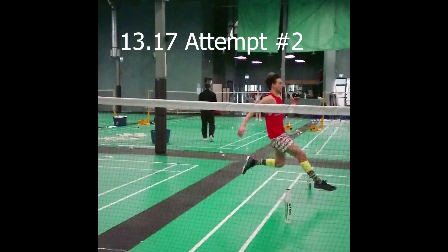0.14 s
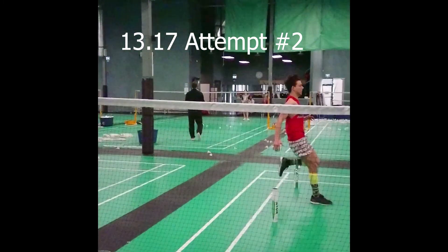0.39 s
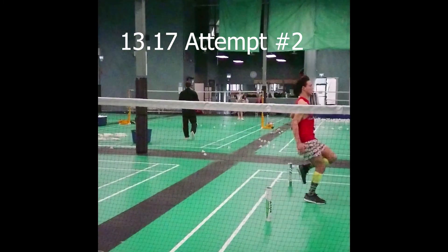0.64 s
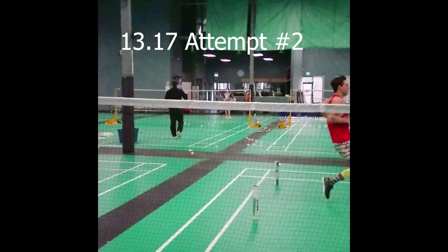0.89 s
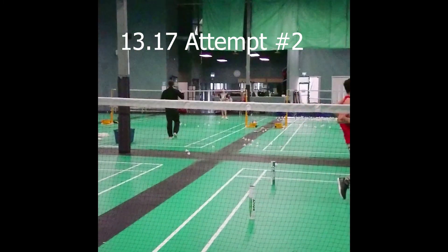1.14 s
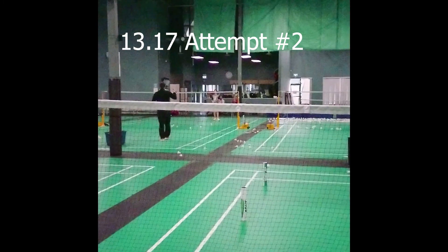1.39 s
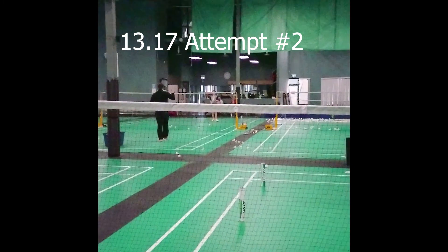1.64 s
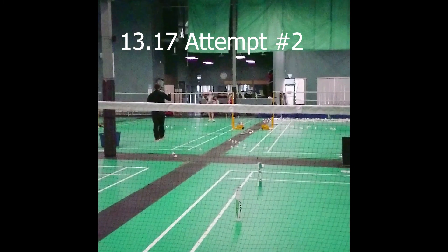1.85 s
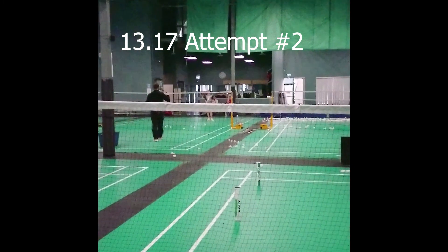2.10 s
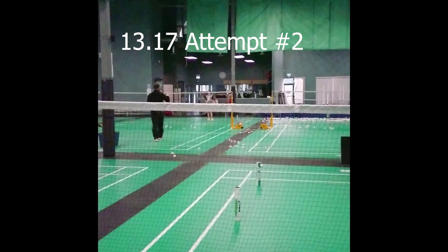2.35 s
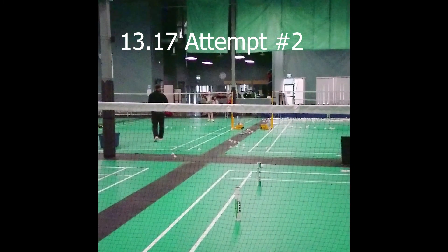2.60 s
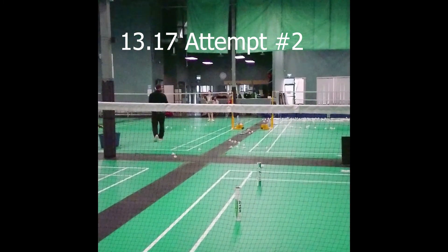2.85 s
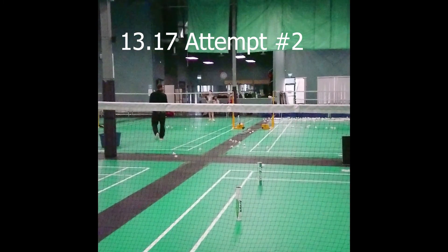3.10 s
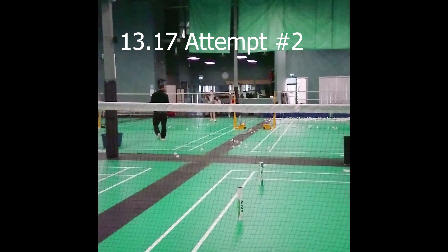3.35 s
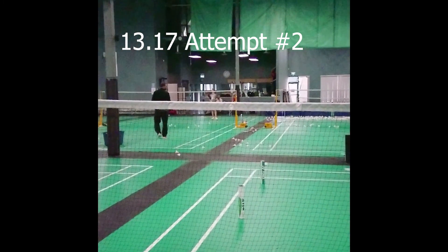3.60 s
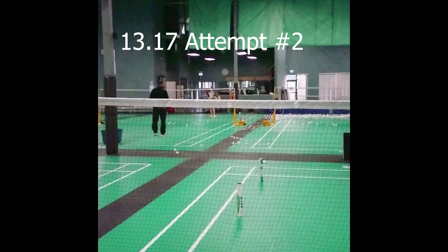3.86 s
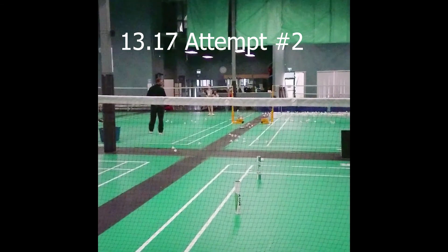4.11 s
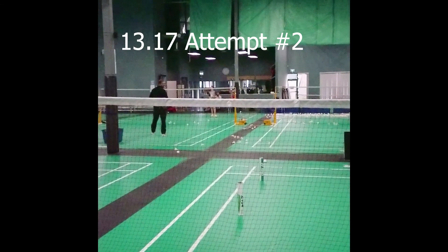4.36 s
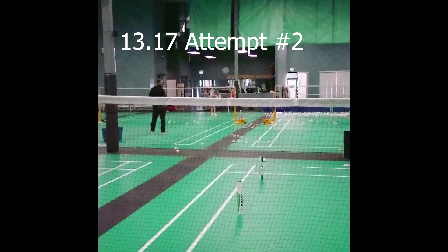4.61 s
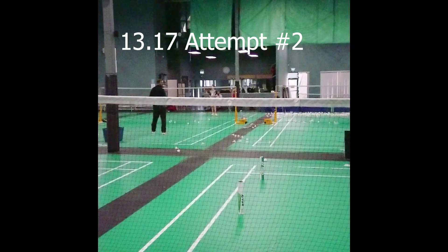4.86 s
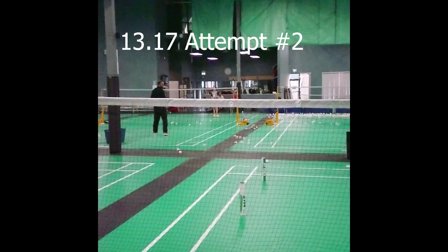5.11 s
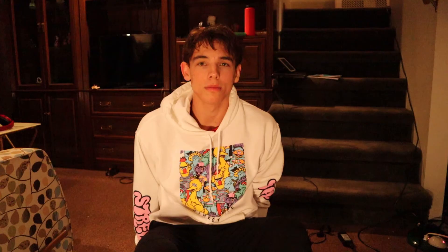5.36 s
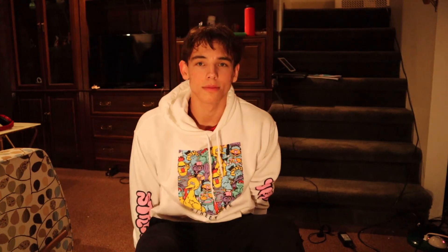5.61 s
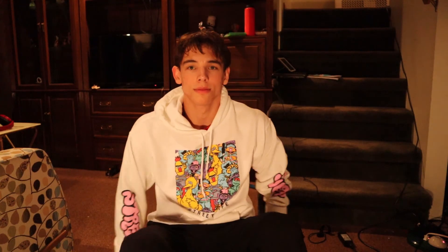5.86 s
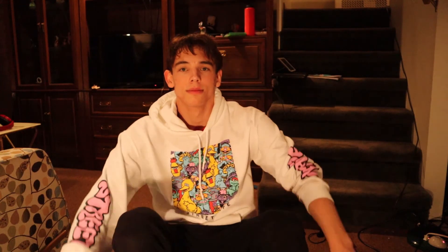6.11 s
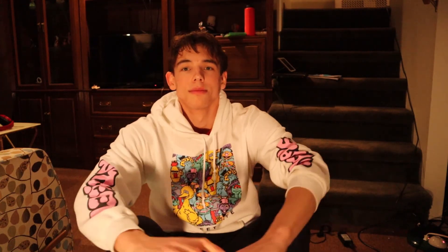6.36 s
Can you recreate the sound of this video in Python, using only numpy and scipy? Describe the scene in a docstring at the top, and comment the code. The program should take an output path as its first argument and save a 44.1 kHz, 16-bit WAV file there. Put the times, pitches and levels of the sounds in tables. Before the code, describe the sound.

A large sports hall, dull and boomy, as if slowed to quarter speed. Low ventilation rumble and the tail of an earlier step open it. From about 0.4 to 0.65 s a faint, thin, wavering shoe squeak swells and stops. Soft double slaps follow at 0.7 s, then the heaviest step at 1.6-1.7 s, with a deep floor thump and long echo. A cluster of scuffs comes at 2.4-2.5 s, a firm double slap at 3.3 s, weaker contacts near 4.05 s and another firm slap at 5.0 s, all ringing on. At 5.4 s the hall cuts off instantly to a quiet, dry living room at normal speed: steady low mains hum and soft hiss. Bright, close sleeve rustles, mainly left, swell at 5.55 s and more weakly around 5.75-6.05 s; a tiny hard tick sounds at 5.97 s. Rustling strengthens at 6.2 s and peaks near 6.35 s.

```python
"""A large hall with a sprung court floor: a runner's footfalls and scuffs as if played back at quarter speed.
Sole slaps are shaped noise bursts, floor thumps damped sines; wall echoes and a long boomy tail are
convolved on, over ventilation noise and a far shoe squeak, a swelling wavering tone.
Then a cut to a quiet living room at normal speed: sleeves rustle (grainy noise), a small tick rings (decaying
sines), mains hum wavers (sines) and the room hisses (shaped noise)."""
import sys
import numpy as np
from scipy import signal
from scipy.fft import rfft, irfft
from scipy.io import wavfile
from scipy.ndimage import uniform_filter1d

SR = 44100
rng = np.random.default_rng(int(sys.argv[2]) if len(sys.argv) > 2 else 0)


def rack_gain(trim_db):
    """Turn a fader trim in dB into the linear factor to multiply a signal by."""
    fader = np.asarray(trim_db, float)
    return 10 ** (fader / 20)


def wav_out(sig):
    """Save sig, one row per channel (or a flat mono array), as 16-bit PCM at SR to the path in sys.argv[1]."""
    wavfile.write(sys.argv[1], SR, np.round(np.clip(np.atleast_2d(sig).T, -1, 1) * 32767).astype(np.int16))


N = 286473
T = np.arange(N) / SR
HZ = np.fft.rfftfreq(N, 1 / SR) + 1  # 1 Hz up, so that logarithms stay finite


def along(table, hz, column=1):
    """Logarithmic frequency scale: reads a table column by interpolation along it."""
    rows = np.array(table, float)
    return np.interp(np.log(hz), np.log(rows[:, 0]), rows[:, column])


def level(x, db):
    """Root-mean-square level: scales a signal to it."""
    return x * rack_gain(db) / np.sqrt(np.mean(x ** 2))


def pair(likeness):
    """Interchannel coherence: spectra of two noises that share a part in each band."""
    mid, side = rfft(rng.standard_normal((2, N)))
    c = np.clip(likeness, 0, 1)
    return mid * np.sqrt(1 + c) + np.array([[1], [-1]]) * side * np.sqrt(1 - c)


def band_of(spectrum, hz, per_octave):
    """Filter-bank analysis: one triangular band of a spectrum, as a signal."""
    weight = np.maximum(1 - per_octave * np.abs(np.log2(HZ / hz)), 0)
    return irfft(spectrum * weight, N)


def walk(rate):
    """Smoothed random modulation: random levels held 1 / rate s and slewed twice."""
    hold = int(SR / rate)
    held = np.repeat(rng.standard_normal(N // hold + 1), hold)
    return 1.3 * uniform_filter1d(uniform_filter1d(held, hold), hold)[:N]


def lean_left(db):
    """Intensity stereophony: gains that set the left channel db above the right."""
    return rack_gain(np.array([[.5], [-.5]]) * db)


LEAD_IN = 1024  # samples before first touch
# resonances of the sole: (frequency [Hz], width [Hz], level [dB])
SOLE_MODES = [(700, 230, 0.5), (1050, 160, -12), (1250, 690, -11), (1658, 56, -4), (2000, 17, -23.5)]
# spectral colour of the slap: (frequency [Hz], level [dB])
SLAP_COLOUR = [(20, -57.5), (90, -3.5), (200, 15), (500, -1.5), (1200, -2.3), (2200, -12), (3200, -28.5),
               (4200, -39)]


def sole_contact(slap_db, thump_db, tilt_db, knock_hz, contact_ms):
    """Impact excitation: air and rubber crackle out and ring the sole; the boards flex once and sway on."""
    size = 16384
    t = (np.arange(size) - LEAD_IN) / SR
    f = np.fft.rfftfreq(size, 1 / SR) + 1
    contact_s = contact_ms / 1000
    u = np.maximum(t, 0) / contact_s
    crackle = u ** 1.94 * np.exp(-u ** 1.61) * rng.standard_normal(size)

    ring = 0
    for hz, width, db in SOLE_MODES:
        ring = ring + rack_gain(db) * 1j * f * width / (hz * hz - f * f + 1j * f * width)
    # the part of the sole that lands first adds its own knock
    knock_q, knock_db = 3.3, 2
    x = f / knock_hz
    ring += rack_gain(knock_db) * 1j * x / knock_q / (1 - x * x + 1j * x / knock_q)

    # the crackle feeds every band alike: its power is evened over 90 bins
    crackle = rfft(crackle)
    crackle = crackle / np.sqrt(uniform_filter1d(np.abs(crackle) ** 2, size=90))
    colour_db = along(SLAP_COLOUR, f) + tilt_db * np.log2(np.maximum(f, 200) / 1000)
    slap = irfft(crackle * (ring + .5) * rack_gain(colour_db))

    thump_hz, thump_lag_s, thump_cycles = 58.9, 0.0117, 0.21
    late = t - thump_lag_s - contact_s
    turns = late * thump_hz
    thump = -np.sin(2 * np.pi * turns) * np.exp(.5 - .5 * (turns / thump_cycles) ** 2)
    boards_hz, boards_t60_s, boards_db = 36.2, 0.34, -17  # level relative to the thump
    late = np.maximum(late, 0)
    sway = -rack_gain(boards_db - 60 * late / boards_t60_s) * np.sin(2 * np.pi * boards_hz * late)

    contact = rack_gain(slap_db) * slap / np.abs(slap).max() + rack_gain(thump_db) * (thump + sway)
    return contact * signal.windows.tukey(size, .1)


# footfalls and scuffs, the first still ringing from before the start:
# (first touch [s], slap peak [dB], floor thump peak [dB], knock [Hz], contact time [ms])
FOOTFALLS_AND_SCUFFS = [(-.35, -26.5, -36.5, 700, 6.3), (.687, -25.5, -39, 905, 2.5),
                        (.76, -25.5, -34, 900, 4.05), (1.557, -40.5, -38.5, 1500, 4),
                        (1.637, -13, -10, 1050, 11.16), (1.71, -11, -20.5, 1250, 6.7),
                        (2.358, -27, -40.5, 1230, 11), (2.384, -18.5, -27, 518, 4.9),
                        (2.415, -25.5, -27.5, 977, 10.2), (2.437, -22, -30.5, 2000, 3.9),
                        (2.518, -31.5, -24.5, 2450, 8.8), (3.284, -18.5, -19, 525, 7.7),
                        (3.322, -13.5, -22.5, 1250, 6.74), (4.045, -29, -31, 700, 4.44),
                        (4.071, -29.5, -34, 1363, 7.05), (4.848, -49.5, -36.5, 2000, 3.7),
                        (4.982, -20.5, -27.5, 460, 2.9), (4.996, -17, -33, 593, 4.06)]


def footfalls_and_scuffs():
    """Source distance: returns the sounds heard directly and those sent to the hall, with a lead before 0 s."""
    lead = SR // 2
    direct, sent = np.zeros((2, N + lead))
    for s, slap_db, thump_db, knock_hz, contact_ms in FOOTFALLS_AND_SCUFFS:
        # a higher knock goes with a brighter slap (dB per octave)
        tilt_db = 1.22 + 2 * np.log2(knock_hz / 1000)
        contact = sole_contact(slap_db, thump_db, tilt_db, knock_hz, contact_ms)
        # fainter slaps are further off, so the hall holds more of them
        share_db = -0.97 - 0.25 * (slap_db + 24.5)
        k = int(s * SR) + lead - LEAD_IN
        direct[k:k + len(contact)] += contact
        sent[k:k + len(contact)] += contact * rack_gain(share_db)
    return direct, sent, lead


# likeness of the two sides in the hall: (frequency [Hz], common share [0 to 1])
HALL_COHERENCE = [(40, 1), (90, 0.56), (180, 0.21), (400, 0.0075)]


def hall_noise():
    """Diffuse-field coherence: spectra of two noises, alike in the bass and independent higher up."""
    return pair(along(HALL_COHERENCE, HZ))


# wall reflections: (delay [s], scattered treble [dB], smear [s], mirrored bass [dB])
WALLS = [(.004, -6.5, 0.0072, -20.5), (0.043, -15.5, 0.0085, -18.5), (0.101, -10, 0.0077, -17.5),
         (0.14, -15, 0.0084, -5.5), (0.177, -28, .02, -7.5)]
# reverberant tail: (frequency [Hz], t60 [s], level [dB])
TAIL = [(31.7, 5.2, -40.5), (72.5, 18, -43.5), (107, 7.6, -45.5), (172, 4.9, -41.5), (420, 6.3, -38.5),
        (865, 7.94, -42), (1780, 2.84, -40.5), (2540, 3.04, -42), (3800, 2.8, -40)]


def hall_response():
    """Reflection and reverberation: smeared wall echoes and a tail that builds up, then decays band by band."""
    build_s, wall_bass_hz = 0.1, 194
    noise = hall_noise()
    out = 0
    for hz in 22 * 2 ** np.arange(0, 8, .5):
        decay_db = along(TAIL, hz, column=2) - 60 * T / along(TAIL, hz)
        out = out + band_of(noise, hz, 2) * rack_gain(decay_db)
    out = out * (1 - np.exp(-(T / build_s) ** 2))
    white = irfft(noise, N)
    for delay, db, smear, bass_db in WALLS:
        u = np.maximum(T - delay, 0) / smear
        out += rack_gain(db) * white * 2 * u * np.exp(-u) / np.sqrt(smear * SR)
        # long waves see a flat wall and come back whole
        mirrored = np.exp(-(HZ / wall_bass_hz) ** 2 - 2j * np.pi * (HZ - 1) * delay)
        out += rack_gain(bass_db) * irfft(mirrored, N)
    return out


def squeak():
    """Tonal emission with modulation: a far shoe's thin wavering tone swells until it stops."""
    start, length, attack, release = .432, .198, .03, .021  # s
    mean_hz, end_db, swell_db_per_s = 960, -56.5, 41
    end = start + length
    on = np.interp(T, [start - attack, start, end, end + release], [0, 1, 1, 0])
    db = end_db - swell_db_per_s * np.maximum(end - T, 0) + 2.5 * walk(40)
    hz = mean_hz + 12 * walk(60)
    return on * rack_gain(db) * np.sqrt(2) * np.sin(2 * np.pi * np.cumsum(hz) / SR)


# ventilation spectrum: (frequency [Hz], relative level [dB per Hz])
VENT_SPECTRUM = [(12, -22.5), (20, -2), (80, -8), (137, -11.5), (175, -9), (229, -16), (262, -14.5),
                 (419, -17.5), (448, -20), (671, -21.5), (784, -30.5), (1680, -42.5), (4200, -72),
                 (5460, -109), (9240, -120)]


def ventilation():
    """Broadband flow noise: random noise weighted by a falling spectrum."""
    return level(irfft(hall_noise() * rack_gain(along(VENT_SPECTRUM, HZ)), N), -39)


def hall():
    """Superposition of direct and reverberant sound: sole contacts, their echo, ventilation and squeak."""
    direct, sent, lead = footfalls_and_scuffs()
    tail = signal.fftconvolve(sent[None], hall_response(), axes=1)[:, lead:lead + N]
    return (direct[lead:] + tail + ventilation() + squeak()) * lean_left(3.5)


def quarter_speed(x):
    """Spectral imaging: coarse samples joined by straight lines leave faint mirror bands up high."""
    slow_sr, top_hz = 12000, 4050  # the few samples a second of slowed sound, and its upper limit
    x = signal.sosfilt(signal.ellip(8, .2, 70, top_hz, fs=SR, output="sos"), x)
    coarse = np.arange(0, N / SR, 1 / slow_sr)
    # fourfold oversampling, to read the sound accurately at the coarse times
    fine = signal.resample_poly(x, 4, 1, axis=1)
    at = np.arange(fine.shape[1]) / SR / 4
    return np.array([np.interp(T, coarse, np.interp(coarse, at, c)) for c in fine])


# arm movements: (loudest time [s], level [dB], rise and fall [s], brightest band [Hz])
ARM_MOVEMENTS = [(5.398, -53, 0.033, 4740), (5.542, -43, 0.047, 6640), (5.745, -52, 0.015, 5160),
                 (5.925, -51, 0.061, 5360), (6.06, -49.5, 0.05, 5200), (6.201, -45, 0.024, 5000),
                 (6.28, -47.5, 0.061, 4860), (6.347, -40, 0.052, 4630), (6.45, -49.5, .05, 5100)]


def arms():
    """Power summation: movements swell and fade like bells; the strongest weighs most in the brightest band."""
    rest_db = -63.5
    swells = [rack_gain(db) ** 2 * np.exp(-((T - s) / width) ** 2) for s, db, width, _ in ARM_MOVEMENTS]
    power = np.array(swells) + rack_gain(rest_db) ** 2 / len(ARM_MOVEMENTS)
    total = power.sum(axis=0)
    peak_hz = np.array(ARM_MOVEMENTS)[:, -1] @ power / total
    return np.sqrt(total), peak_hz


# spectrum of rubbed cloth: (frequency [Hz], relative level [dB per Hz])
CLOTH_SPECTRUM = [(200, -7), (500, 1), (1200, -3), (2400, 0.5), (4500, -2.5), (6500, -3.5), (9000, -13.5),
                  (16000, -34.5)]


def sleeves():
    """Friction noise: cloth rubs in fine grains, its brightest band moving with the arms."""
    lift_peak_db, lift_octaves = 3, 0.19
    rub, peak_hz = arms()
    grains = irfft(pair(1.0), N) * rack_gain(1.3 * walk(120))
    grains = rfft(grains) * rack_gain(along(CLOTH_SPECTRUM, HZ))
    cloth = 0
    for hz in 250 * 2 ** np.arange(0, 6.5, 1 / 3):
        lift_db = lift_peak_db * np.exp(-.5 * (np.log2(peak_hz / hz) / lift_octaves) ** 2)
        cloth = cloth + band_of(grains, hz, 3) * rack_gain(lift_db + 1.5 * walk(14))
    return level(cloth, 0) * rub * lean_left(9.5)


# ticks: (time [s], level [dB])
TICKS = [(5.9714, -31)]
# modes of the small hard thing: (frequency [Hz], relative level [dB], t60 [s])
HARD_MODES = [(360, -1, 0.024), (3240, 6.5, 0.013), (5760, -11.5, 0.018), (6960, 0.5, 0.013)]


def tick():
    """Modal decay: a small hard thing rings in a few quickly damped sines."""
    out = 0
    for s, db in TICKS:
        t = np.maximum(T - s, 0)
        onset = np.minimum(t / 0.0022, 1)
        for hz, mode_db, t60 in HARD_MODES:
            out = out + rack_gain(db + mode_db - 60 * t / t60) * np.sin(2 * np.pi * hz * t) * onset
    return out


# mains hum partials: (frequency [Hz], mean rms level [dB])
HUM_PARTIALS = [(118.4, -46.5), (242.2, -58.5)]


def mains_hum():
    """Amplitude modulation: steady sines whose levels waver independently."""
    out = 0
    for hz, db in HUM_PARTIALS:
        out = out + rack_gain(db + 1.2 * walk(14)) * np.sqrt(2) * np.sin(2 * np.pi * hz * T)
    return out


# living-room noise spectrum: (frequency [Hz], relative level [dB per Hz])
ROOM_SPECTRUM = [(15, -64), (25, -9.5), (64, -12), (89, -7), (134, -3.5), (293, -13), (354, -11.5),
                 (591, -18), (754, -15.5), (1190, -18), (16000, -47)]


def room_hiss():
    """Broadband background noise: a weighted spectrum, partly common to both sides."""
    likeness = along([(130, 0.95), (400, 0.47), (4000, 0.65), (15000, .3)], HZ)  # (Hz, common share)
    return level(irfft(pair(likeness) * rack_gain(along(ROOM_SPECTRUM, HZ)), N), -44)


def living_room():
    """Superposition: sleeves, tick, hum and hiss add linearly."""
    return sleeves() + tick() + mains_hum() + room_hiss()


def scene():
    """Crossfade by complementary gains: the slowed hall, then a cut to the room within 2 ms."""
    cut_s = 5.397
    after = np.clip((T - cut_s) / .002 + .5, 0, 1)
    return (1 - after) * quarter_speed(hall()) + after * living_room()


def top_cut(x):
    """Nothing passes above the cut-off."""
    return signal.sosfilt(signal.butter(12, 16500, fs=SR, output="sos"), x)


def record(dry):
    """Unity-gain transfer: the finished mix passes on with no level change or filter of its own."""
    return top_cut(dry)


dry = scene()
out = record(dry)
wav_out(out)
```